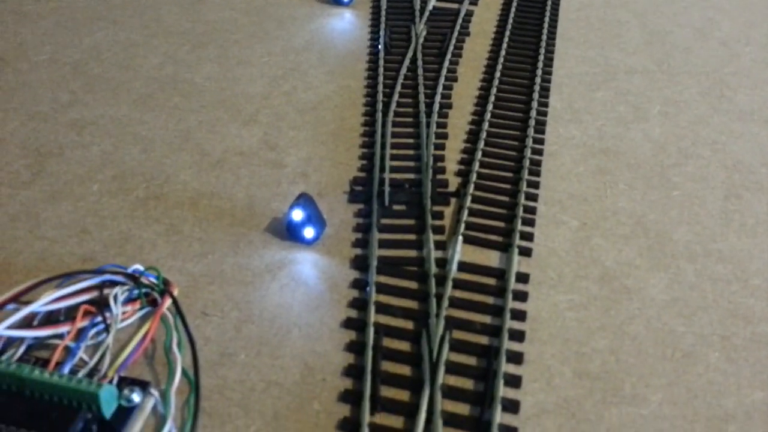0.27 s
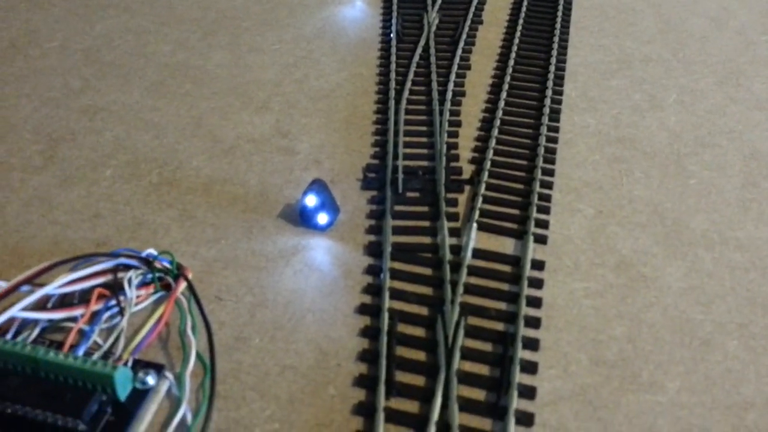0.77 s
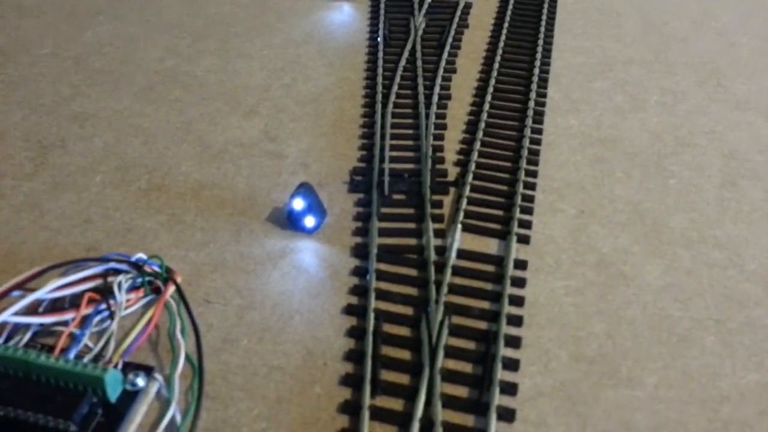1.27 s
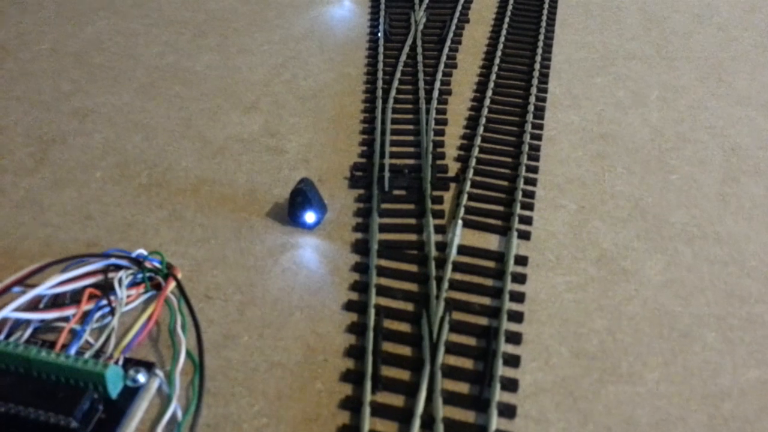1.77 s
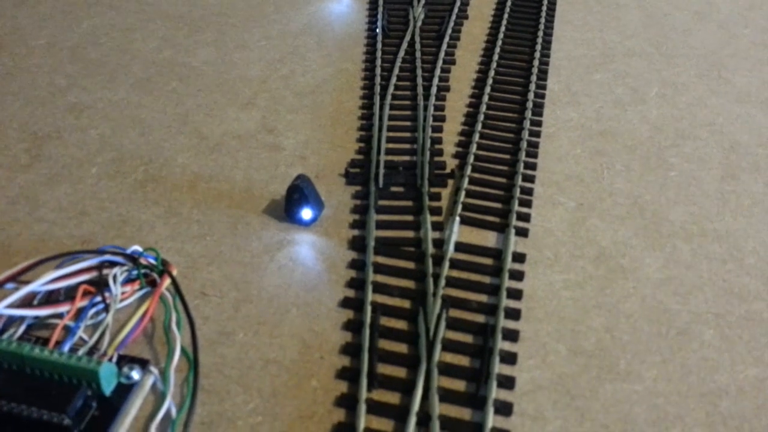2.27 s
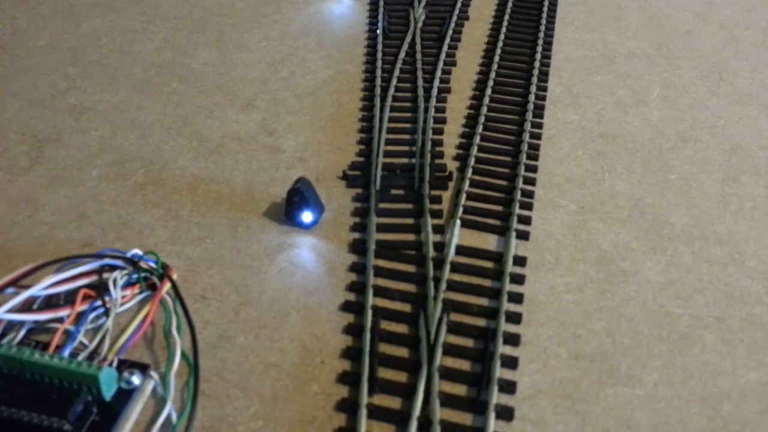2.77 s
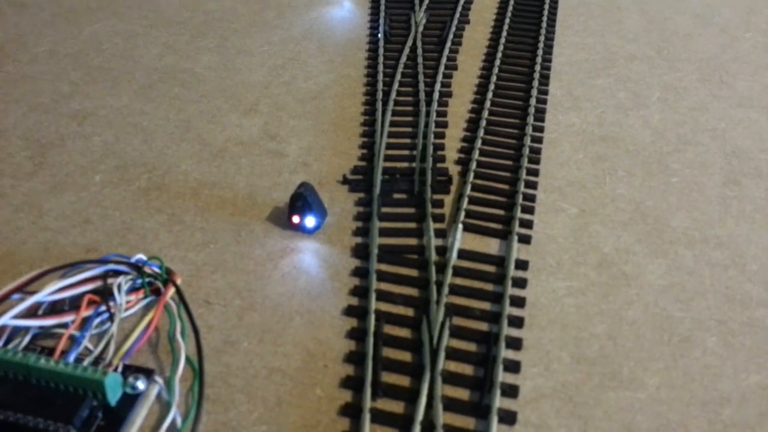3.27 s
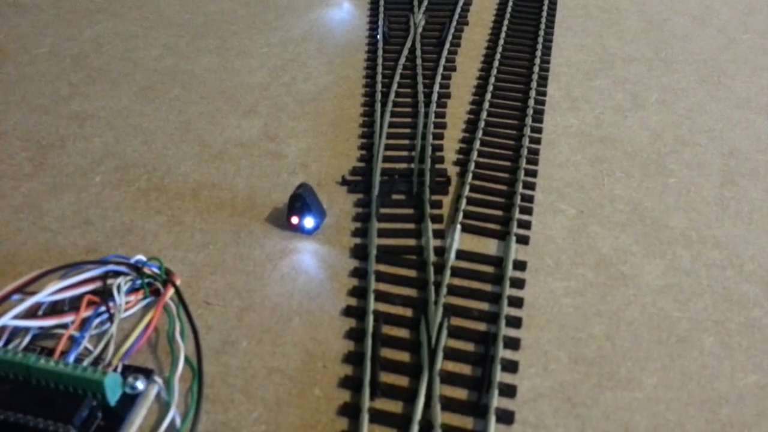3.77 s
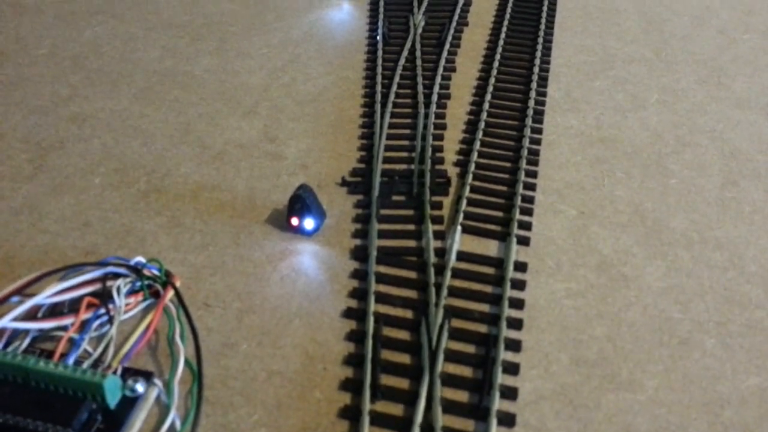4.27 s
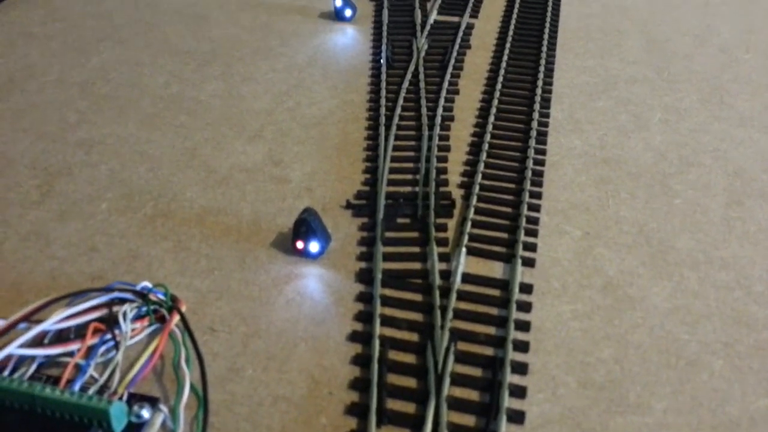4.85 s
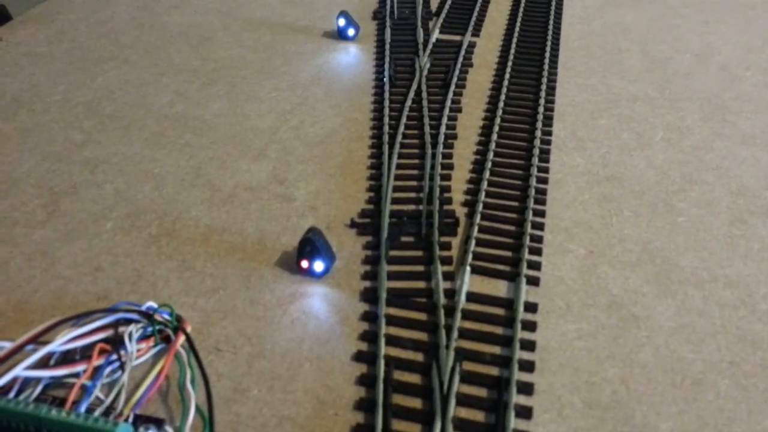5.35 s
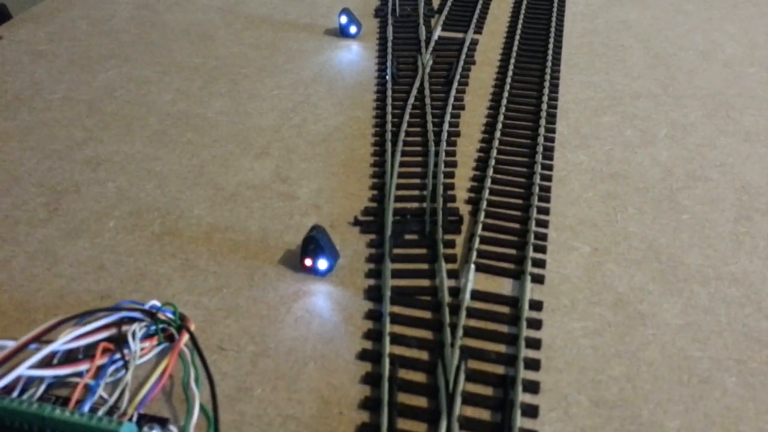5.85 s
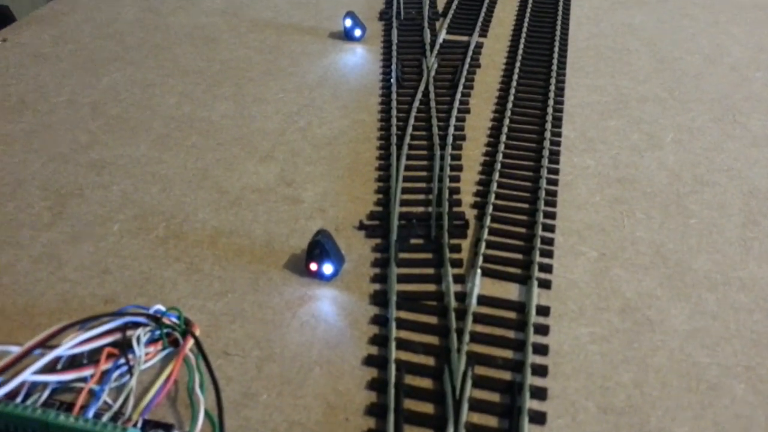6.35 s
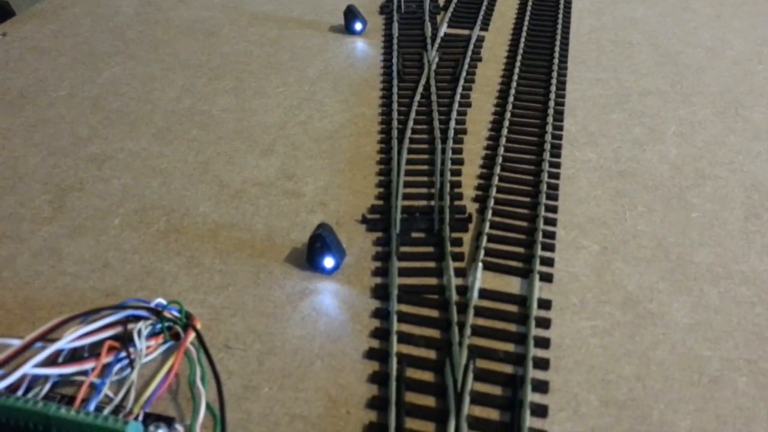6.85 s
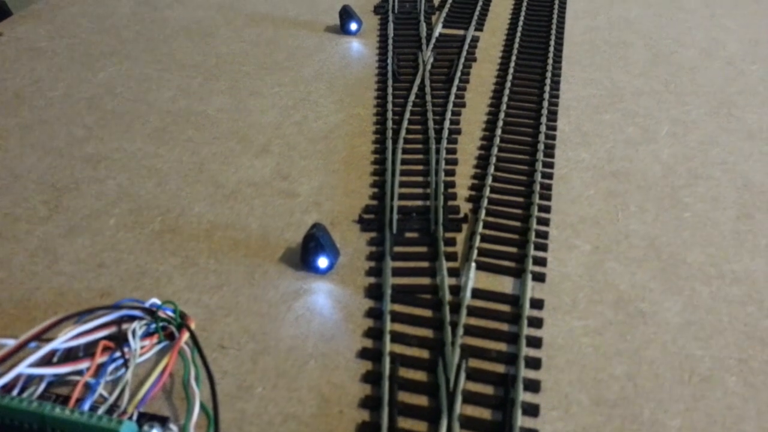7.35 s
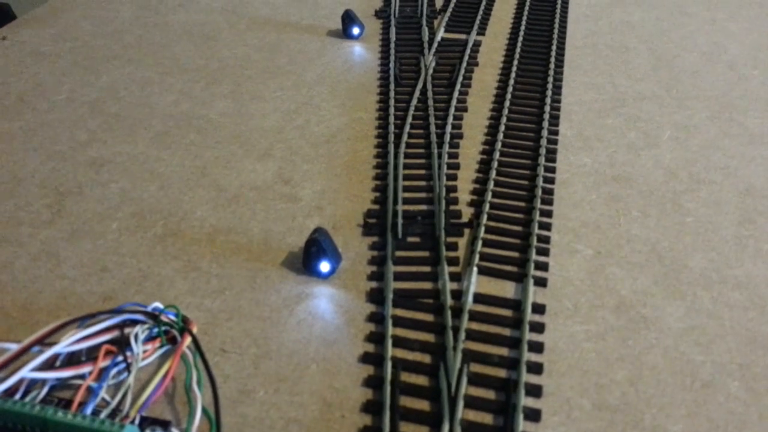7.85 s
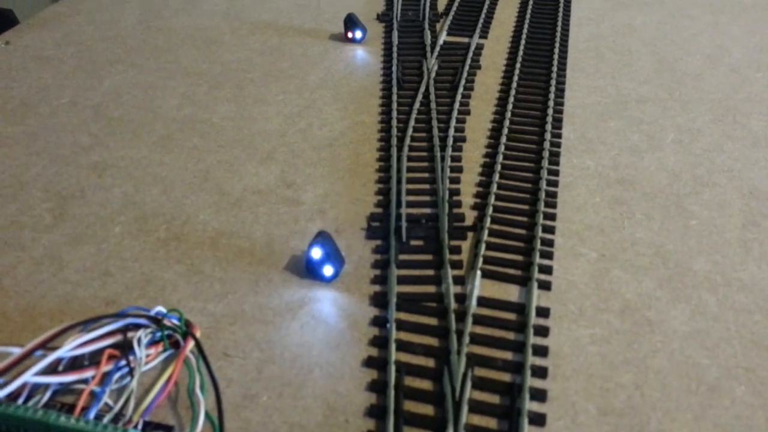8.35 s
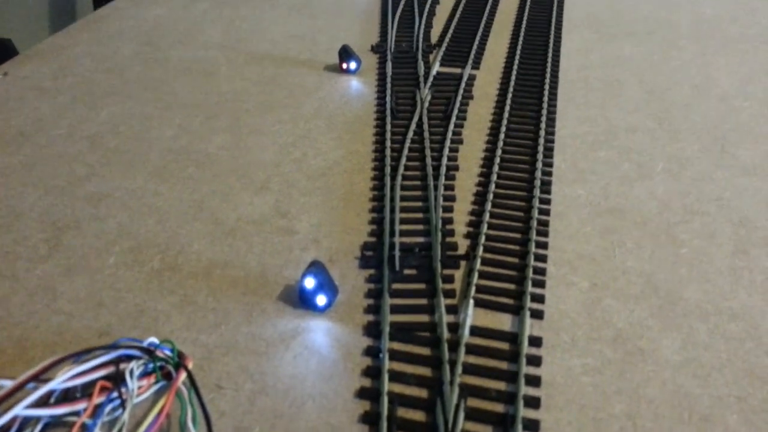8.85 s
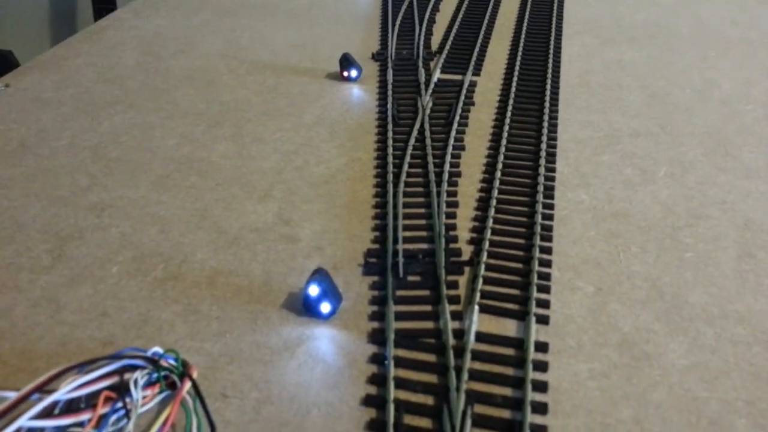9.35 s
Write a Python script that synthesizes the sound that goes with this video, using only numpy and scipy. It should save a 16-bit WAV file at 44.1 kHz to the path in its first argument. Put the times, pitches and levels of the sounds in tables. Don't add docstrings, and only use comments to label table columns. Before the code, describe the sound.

Faint fast servo chatter in a quiet humming room, broken by two button thumps, each starting a loud, raspy motor buzz of about 1.6 seconds.

```python
import sys
import numpy as np
from scipy import signal
from scipy.fft import rfft, irfft, next_fast_len
from scipy.io import wavfile
from scipy.ndimage import uniform_filter1d

SR = 44100
rng = np.random.default_rng(int(sys.argv[2]) if len(sys.argv) > 2 else 0)


def gain_from_db(level_db):
    decades = np.asarray(level_db, float) / 20
    return 10 ** decades


def persist_wave(psi):
    counts = np.round(np.clip(psi, -1, 1) * 32767).astype(np.int16)
    wavfile.write(sys.argv[1], SR, np.atleast_2d(counts).T)


N = 424241
FRAME_HZ = 51.479
PORT_LAG = 0.000267
TOP_HZ = 15800

# frequency in Hz, density in dB per Hz.
AIR_TONE = [(25, -31), (60, -21.5), (130, -12.5), (270, -4), (480, -4.5), (650, -10), (1400, -10),
            (2000, -15), (3500, -7.5), (5200, -33), (8000, -22.5), (16000, -24)]
# frequency in Hz, left-right likeness from 0 to 1.
AIR_COHERENCE = [(40, 0), (130, 0.72), (290, 0.85), (450, 0.92), (640, 0.25), (1400, 0.22), (3000, 0),
                 (8000, 0)]
# centre in Hz, width in Hz, lift in dB.
HUM_BANDS = [(142.4, 5, 8.5), (179.5, 2.7, 6.5), (209, 5.8, 3.5), (274.5, 0.98, 8), (326.6, 6.7, 7.5),
             (399.7, 5.9, 6), (715, 44, 4), (801, 31, 5.5)]
# frequency in Hz, level in dB.
HUM_TONES = [(145.3, -78), (217.4, -67.5), (274.5, -62.5), (330, -76), (726.7, -76), (823.6, -63)]

# time in seconds, lag after the frame start in ms.
HOLD_LAG = [(0, 2.5), (1.4, 1), (3.2, -1.65), (6.2, -0.9), (7.9, 1.63), (9.6, 0.86)]
# start in seconds, level in dB, extra while settling in dB, settling time in seconds,
# kick length in ms.
REST = [
    (0, -41, -1.5, 0.14, 2.2),
    (1.43, -39, 0, .3, 8.4),
    (3.17, -41.5, 4.5, .35, 4.3),
    (4.12, -40.5, 1.5, 0.82, 5.8),
    (5.63, -40, 0.5, 0.49, 4.8),
    (7.87, -40.5, 1, 0.32, 2),
    (8.66, -40.5, 5, 0.19, 1.8),
]
# start in seconds, run in frames, change in dB.
UNEVEN_HOLDING = [(0.102, 3, -14), (0.18, 1, -18), (0.199, 1, -7), (0.432, 1, -7), (0.665, 3, -13),
                  (0.743, 1, -3), (0.763, 1, -15), (0.801, 1, -18), (0.879, 1, -13), (0.899, 3, 1),
                  (1.035, 1, -10), (1.132, 1, -20), (1.248, 1, -22), (1.365, 1, -30), (3.327, 1, -7),
                  (4.007, 1, 6), (4.104, 1, -31), (4.551, 1, -6), (5.328, 1, 3), (5.561, 2, -5),
                  (5.755, 1, -6), (7.892, 1, -7), (7.95, 1, -16), (7.989, 1, -4), (8.105, 1, -11),
                  (8.164, 1, -4), (8.377, 1, -5), (8.397, 1, -19), (8.552, 1, -2), (8.591, 1, -1)]
# time in seconds, diffuse share in dB.
HOLD_DIFFUSE = [(1.4, -3.8), (3.1, -1.2), (6.2, -1.2), (7.9, -3.8)]
# frequency in Hz, density in dB per Hz.
HOLD_TONE = [(710, -40), (1200, -13), (1600, -13.5), (1890, -13), (2240, -3), (2740, -7.5), (3060, -1),
             (3750, 1), (4660, -9), (5950, -15.5), (6810, -17), (9000, -31.5), (11700, -41), (19800, -120)]
# frequency in Hz, density in dB per Hz.
LATE_TONE = [(710, -32), (1200, -5), (1640, -8), (1840, -10.5), (2240, 4), (2500, -3.5), (2810, -1),
             (3470, 3.5), (3870, -4), (6160, -12), (9000, -31.5), (11700, -34), (19800, -120)]
# centre in Hz, width in Hz, lift in dB.
HOLD_MODES = [(1640, 140, 7), (2572, 31, 6), (3010, 21, 4.5), (3290, 45, 6.5), (3990, 45, -20),
              (4680, 340, 7), (5500, 170, 7), (6760, 270, 6.5), (6200, 130, 4)]
# frequency in Hz, left minus right in dB.
HOLD_PAN = [(1000, -6), (2400, -2.5), (4500, 0), (5500, -5), (6500, -12), (7600, -3.5), (9000, 7)]

# start in seconds, thump in dB, tick in dB, direction (+1 press, -1 release).
BUTTON = [
    (1.4021, -22.5, -18, 1),
    (1.5509, -32, -30, -1),
    (6.2199, -22.5, -16, 1),
    (6.361, -31, -28, -1),
]
# frequency in Hz, level in dB, t60 in seconds.
BOARD_MODES = [(295, 18, 0.013), (430, -1.5, 0.038), (347, -18.5, 0.19), (256, -19, 0.23),
               (442.3, -16, 0.13)]
# frequency in Hz, t60 in seconds.
WALLS = [(300, 0.63), (3000, 0.18)]

# start in seconds, stop in seconds, creeping rasp in dB, case in dB,
# run-down in seconds.
MOVES = [
    (1.45, 3.088, -37, -34.5, 0.0079),
    (6.256, 7.848, -35.5, -33, 0.027),
]
# start in seconds, level in dB, case share in dB, length in ms.
JERKS = [(0.2149, -31.5, 1, 3), (1.4386, -15, -1, 1), (1.597, -16.5, 0, 8), (1.7105, -17.5, -17, 2.4),
         (1.927, -16, -0.5, 9), (4.4885, -21, 0, 2.1), (4.992, -16, -4.5, 2.7), (5.657, -21.5, -2, 2.5),
         (6.2548, -14.5, -3, 8.5), (8.146, -28, 0.5, 3), (8.335, -27.5, 3, 2.1), (8.6083, -47, 21.5, 2.6),
         (8.6258, -22, 2.5, 2.4), (8.6692, -20, -0.5, 2.4)]
# start in seconds, level over the creep in dB, length in ms.
SURGES_OUT = [(1.559, 8, 14), (1.578, 11.5, 7.2), (1.753, 12, 14), (1.773, 11, 12), (1.792, 3, 8.8),
              (1.812, 9.5, 12.8), (1.967, 11, 15), (1.986, -1, 6.9), (2.025, 12.5, 6.8), (2.181, 12, 11),
              (2.219, 13.5, 13), (2.239, 13.5, 8.1), (2.278, 9.5, 4.8), (2.297, 5.1, 7.2),
              (2.355, 7.5, 9.8), (2.394, 5, 3.9), (2.414, 14.5, 11), (2.433, 6, 8.9), (2.569, 14, 5.6),
              (2.608, 13, 8.9), (2.666, 11.5, 11), (2.763, 7.5, 9.4), (2.802, 5.2, 10.0), (2.822, 8.5, 11),
              (2.861, 8.5, 9.5), (2.899, 14.5, 6.9), (2.919, 4, 5.7), (3.035, 10, 5.1)]
# start in seconds, level over the creep in dB, length in ms.
SURGES_BACK = [(6.279, 7.5, 9.3), (6.299, -1, 9.8), (6.377, 6.5, 8.6), (6.396, 5.0, 12), (6.59, 4.5, 12),
               (6.648, 6.8, 13), (6.687, 3.5, 7.9), (6.804, 7, 13.6), (6.862, 3.5, 10), (7.018, 8, 13),
               (7.056, 7, 8.9), (7.095, 8, 6.9), (7.115, 7.5, 15), (7.134, 1, 13), (7.27, 1, 7.7),
               (7.29, 8.1, 7.6), (7.309, 4.5, 15), (7.328, 4.5, 9.6), (7.348, 1.7, 9.9), (7.406, 5, 17),
               (7.426, 4.5, 11.2), (7.484, 10, 5), (7.503, 6, 13), (7.523, 5, 7.9), (7.62, 3, 7.9),
               (7.697, 9.5, 10), (7.717, 10, 9.8), (7.756, 5, 13)]
# start in seconds, change in dB.
STALLS = [(1.462, -12), (1.481, -10), (1.501, -6), (1.52, -19), (1.54, -2), (1.637, -10), (1.695, -17),
          (2.084, -7), (2.103, -3), (2.453, -3), (2.55, -18), (2.744, -10), (2.841, -9), (2.88, -15),
          (2.958, -18), (6.357, -4), (6.435, -7.2), (6.532, -22), (6.571, -12), (6.668, -9), (6.746, -10),
          (6.765, -4), (6.843, -24), (6.959, -3), (7.192, -6), (7.367, -6), (7.445, -12.0), (7.542, -1),
          (7.561, -7), (7.795, -2)]
# frequency in Hz, density in dB per Hz.
RASP_TONE = [(3240, -80), (5500, -9.5), (5750, -1.5), (6030, -4), (7580, -6.5), (8120, -17.5),
             (8720, -11.5), (9200, -29), (12000, -58), (20200, -120)]
# frequency in Hz, density in dB per Hz.
CASE_TONE = [(590, -53), (1000, -32), (1590, -14.5), (1870, -16), (2480, -10.5), (3630, -4), (4380, -3.5),
             (5290, -6.5), (5600, -8), (7280, -32), (12300, -120)]
# frequency in Hz, density in dB per Hz.
FIZZ_TONE = [(5410, -32), (9200, 6), (9900, -1), (11300, -5.5), (13000, -0.5), (14300, -3.5), (16000, -9)]
FIZZ_DB = [-14, -9.5, -13.5]
# centre in Hz, width in Hz, lift in dB.
GEAR_MODES = [(3690, 110, 4), (4400, 190, 5), (4990, 130, 4), (5940, 190, 8), (6600, 200, 2),
              (7500, 140, 3.5), (8740, 220, 2.5), (10500, 350, 4)]
# frequency in Hz, left minus right in dB.
MOVE_PAN = [(5500, -2), (6500, -14.5), (7600, -8.5), (8600, -5), (9600, -2), (15000, -2)]


def unit(x):
    return x / np.sqrt(np.mean(x ** 2) + 1e-20)


def along(points, hz):
    f, v = np.transpose(points)
    return np.interp(np.log(hz + 1), np.log(f + 1), v)


def filtered(x, response):
    m = next_fast_len(N + SR // 2)
    return irfft(rfft(x, m) * response(np.fft.rfftfreq(m, 1 / SR)), m)[..., :N]


def colour(tone, modes):
    def response(hz):
        lift = 1
        for centre, width, db in modes:
            damping = 1j * hz * width
            lift = lift + (gain_from_db(db) - 1) * damping / (centre ** 2 - hz ** 2 + damping)
        return gain_from_db(along(tone, hz)) * lift
    return response


def ports(hz):
    return np.exp(1j * np.pi * hz * PORT_LAG * np.array([[1], [-1]]))


def room():
    air = colour(AIR_TONE, HUM_BANDS)

    def mid_side(hz):
        turn = np.arccos(np.clip(along(AIR_COHERENCE, hz), -1, 1)) / 2
        return air(hz) * [np.cos(turn), np.sin(turn)]

    mid, side = filtered(rng.standard_normal((2, N)), mid_side)
    t = np.arange(N) / SR
    tones = sum(gain_from_db(db + 3.5) * np.sin(2 * np.pi * hz * t) for hz, db in HUM_TONES)
    both = gain_from_db(-50) * unit(np.array([mid + side, mid - side])) + tones
    return filtered(both * gain_from_db([[-.6], [.6]]), ports)


def frames():
    return np.arange(int(N / SR * FRAME_HZ)) / FRAME_HZ


def per_frame(rows):
    s, *columns = np.transpose(rows)
    index = np.round((s - .005) * FRAME_HZ).astype(int)
    return [np.bincount(index, column, len(frames())) for column in columns]


def resting(s):
    latest = np.maximum(np.searchsorted(np.transpose(REST)[0], s) - 1, 0)
    since, level_db, settle_db, settle_s, length_ms = np.array(REST)[latest].T
    return level_db, settle_db * np.exp(-(s - since) / settle_s), length_ms


def kicks(starts, gains, length_ms, rise, fall, repeat, teeth_db, alike, wet_db, t60):
    t = np.arange(SR // 40) / SR
    fresh, kept, lumps, left, right = rng.standard_normal((5, len(starts), len(t)))
    kept = unit(uniform_filter1d(kept, size=12, axis=0))
    common = np.sqrt(repeat) * kept + np.sqrt(1 - repeat) * fresh

    teeth = gain_from_db(teeth_db * unit(uniform_filter1d(lumps, size=24, axis=1)))
    run = np.clip(length_ms, 1, 18)[:, None] / 1000
    swell = 1 - np.exp(-(t / rise) ** 2)
    shape = teeth * swell * np.exp(-np.maximum(t - run, 0) / fall)
    shape = shape / np.sqrt(np.sum(shape ** 2, axis=1, keepdims=True) * FRAME_HZ / SR)

    at = np.maximum(np.round(starts * SR).astype(int), 0)[:, None] + np.arange(len(t))

    def laid(rows):
        return np.bincount(at.ravel(), rows.ravel(), N + SR)[:N]

    keep = gain_from_db(-120 / (t60 * SR))
    wet = np.reshape(gain_from_db(wet_db), (-1, 1))
    out = []
    for gain in gains:
        size = gain[:, None] * shape
        direct = [laid(size * (np.sqrt(alike) * common + np.sqrt(1 - alike) * own)) for own in (left, right)]
        lingering = signal.lfilter([1 - keep], [1, -keep], laid((wet * size) ** 2))
        out.append(direct + np.sqrt(np.abs(lingering)) * rng.standard_normal((2, N)))
    return out


def voiced(x, tone, modes, pan):
    response = colour(tone, modes)
    scale = np.sqrt(np.mean(np.abs(response(np.linspace(0, SR / 2, num=2048))) ** 2))

    def to_ports(hz):
        balance = gain_from_db(along(pan, hz) * np.array([[.5], [-.5]]))
        return response(hz) / scale * ports(hz) * balance

    return filtered(x, to_ports)


def scattered(x, echo_db, t60):
    t = np.arange(SR // 12) / SR
    path = rng.standard_normal((2, len(t))) * gain_from_db(-60 * t / t60) * (1 - np.exp(-t / 0.0011))
    path = gain_from_db(echo_db) * path / np.linalg.norm(path, axis=1, keepdims=True)
    path[:, 0] = 1
    return signal.fftconvolve(x, path / np.linalg.norm(path[0]), axes=1)[:, :N]


def holding():
    s = frames()
    level_db, settling_db, length_ms = resting(s)
    uneven = [(t + k / FRAME_HZ, db) for t, run, db in UNEVEN_HOLDING for k in range(round(run))]
    hunt_db = 1.1 * rng.standard_normal(len(s))
    level_db = level_db + settling_db + per_frame(uneven)[0] + hunt_db
    lag = (np.interp(s, *np.transpose(HOLD_LAG)) - .9) / 1000

    late = s > MOVES[1][0]
    blur_db = settling_db * np.where(late, 1, 0.32)
    gains = [~late * gain_from_db(level_db - 4.5), late * gain_from_db(level_db - 6.5)]
    wet_db = np.interp(s, *np.transpose(HOLD_DIFFUSE)) + blur_db
    early_kicks, late_kicks = kicks(
        s + lag, gains, 0.74 * (length_ms + 2.2 * blur_db), rise=.0019, fall=.0024,
        repeat=0.63, teeth_db=1.5, alike=.7, wet_db=wet_db, t60=0.17)
    early_sound = voiced(early_kicks, HOLD_TONE, HOLD_MODES, HOLD_PAN)
    return early_sound + voiced(late_kicks, LATE_TONE, HOLD_MODES, HOLD_PAN)


def button():
    x, t = np.zeros(N + SR), np.arange(SR // 4) / SR
    ring = sum(gain_from_db(db - 60 * t / t60) * np.sin(2 * np.pi * hz * t) for hz, db, t60 in BOARD_MODES)
    ring = ring * (1 - np.exp(-(t / 0.0029) ** 2))
    for s, db, tick_db, way in BUTTON:
        grit = np.convolve(rng.standard_normal(len(t)), [1, 1, 0, -1, -1], "same") / 2
        tick = gain_from_db(-60 * t / 0.0081) * grit
        x[round(s * SR):][:len(t)] += gain_from_db(db + 2) * (np.sign(way) * ring + gain_from_db(tick_db) * tick)

    hz, t, z = signal.stft(rng.standard_normal((2, SR // 3)), SR, nperseg=128)
    decay = gain_from_db(-60 * t / along(WALLS, hz)[:, None])
    walls = signal.istft(z * decay, SR, nperseg=128)[1]
    echo = signal.fftconvolve(x[None, :N], walls / np.linalg.norm(walls[0]), axes=1)[:, :N]
    both = x[:N] * gain_from_db([[-.6], [.6]]) + gain_from_db(-12.5) * echo
    return filtered(both, lambda hz: ports(hz) * (1j * hz / (150 + 1j * hz)) ** 2)


def shifting(x):
    z = signal.stft(x, nperseg=256)[2]
    field = uniform_filter1d(rng.standard_normal(z.shape[1:]), size=5, axis=0)
    field = uniform_filter1d(field, size=7, axis=1)
    return signal.istft(z * gain_from_db(2.3 * unit(field) - 1.5), nperseg=256)[1][:, :N]


def moving():
    s = frames()
    move = (s > MOVES[0][1]).astype(int)
    start, stop, rasp_db, case_db, down_s = np.array(MOVES)[move].T
    running = (s > start) & (s < stop)
    surge_db, surge_ms = per_frame([*SURGES_OUT, *SURGES_BACK])
    creeping = surge_ms == 0
    step_chance, case_chance, length_chance = rng.standard_normal((3, len(s)))

    run_down_db = 19 * np.exp(-np.abs(stop - s) / down_s)
    step_db = surge_db + per_frame(STALLS)[0] + creeping * 1.6 * step_chance - run_down_db
    strain_db = 3 * np.exp(-np.abs(s - start) / 0.28)
    case_db = case_db + 0.5 * step_db + strain_db + case_chance
    length_ms = surge_ms + creeping * (8.8 + 3 * length_chance)

    when, jerk_db, share_db, jerk_ms = np.transpose(JERKS)
    settling = gain_from_db(-49) * np.abs(gain_from_db(resting(s)[1]) - 1)
    rasp = running * gain_from_db(rasp_db + step_db - 8.0) + ~running * settling
    rasp = np.append(rasp, gain_from_db(jerk_db - 23.0))
    case = np.append(running * gain_from_db(case_db - 6.0), gain_from_db(jerk_db + share_db - 18))
    fizz = rasp * gain_from_db(np.take(FIZZ_DB, np.append(move, np.full(len(when), -1))))

    fall = np.append(np.full(len(s), .0035), np.full(len(when), .0018))[:, None]
    starts = np.append(s, when) - .0014
    high, low, top = kicks(
        starts, [rasp, case, fizz], np.append(length_ms, jerk_ms), rise=.0022, fall=fall,
        repeat=0.03, teeth_db=2, alike=.8, wet_db=-4.5, t60=0.13)
    rasp_sound = voiced(high, RASP_TONE, GEAR_MODES, MOVE_PAN)
    case_sound = voiced(low, CASE_TONE, GEAR_MODES, HOLD_PAN)
    fizz_sound = voiced(top, FIZZ_TONE, GEAR_MODES, MOVE_PAN)
    return rasp_sound + case_sound + fizz_sound


def scene():
    air = room()
    chatter = scattered(holding(), echo_db=-6, t60=.03)
    thumps = button()
    rasps = scattered(shifting(moving()), echo_db=-6, t60=.025)
    return air + chatter + thumps + rasps


def low_pass(x):
    return signal.sosfilt(signal.butter(12, 16470, fs=SR, output="sos"), x)


def record(dry):
    finished = filtered(dry, lambda hz: hz < TOP_HZ)
    return low_pass(finished)


dry = scene()
out = record(dry)
persist_wave(out)
```